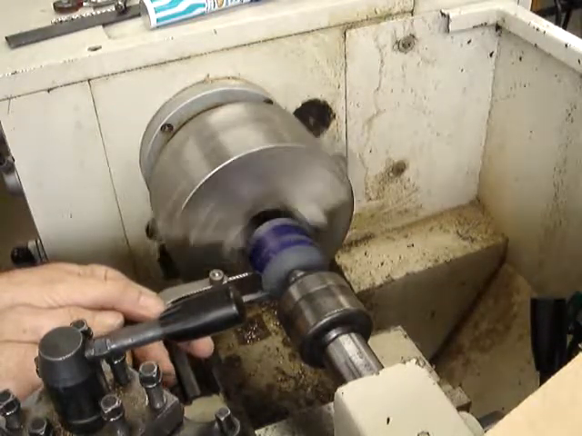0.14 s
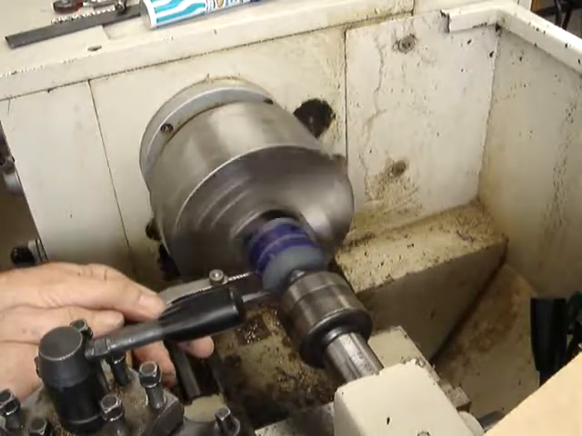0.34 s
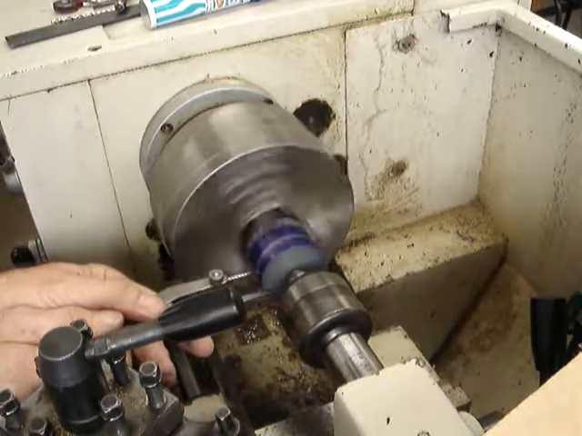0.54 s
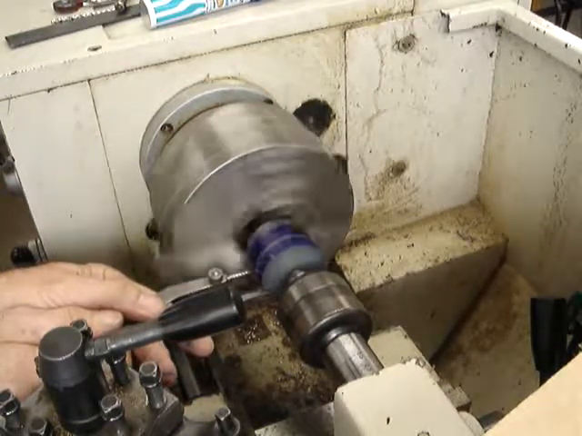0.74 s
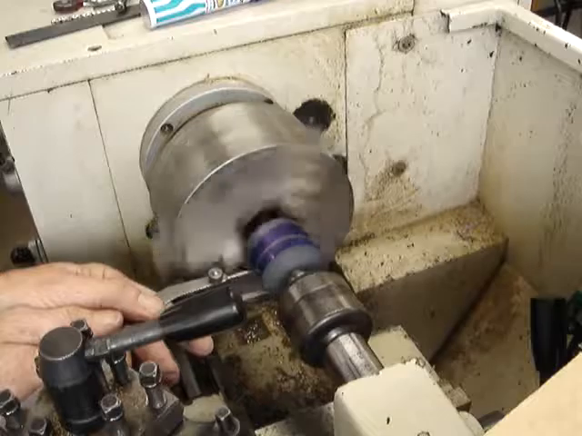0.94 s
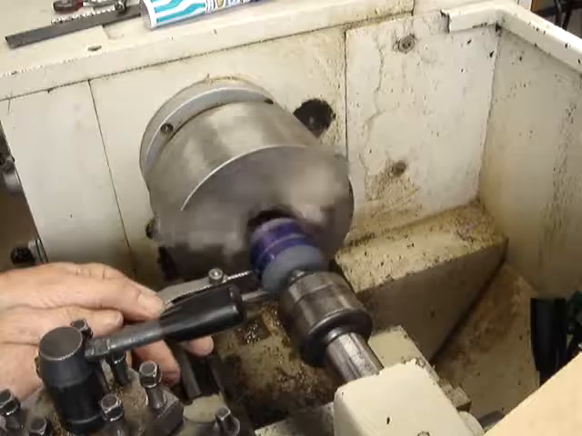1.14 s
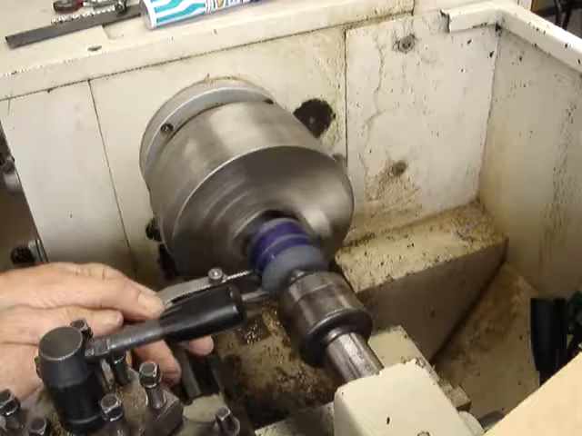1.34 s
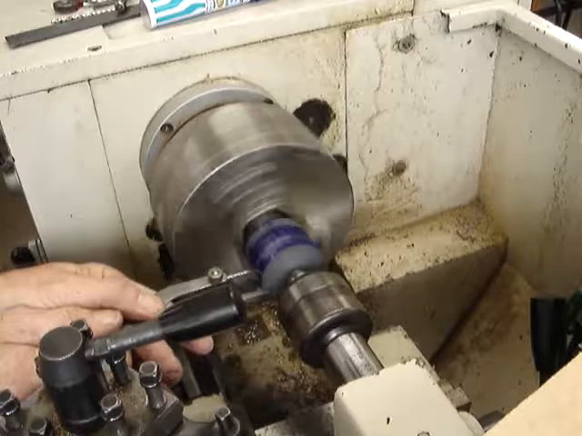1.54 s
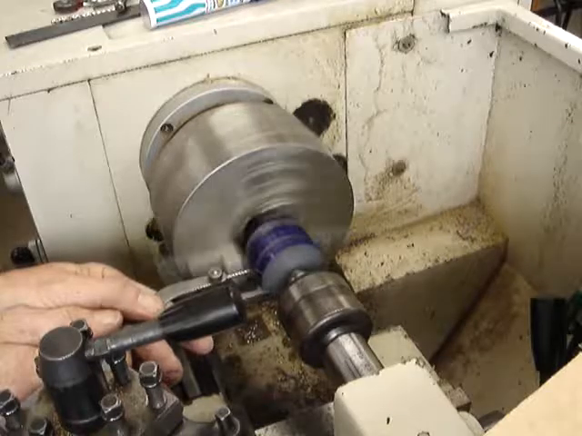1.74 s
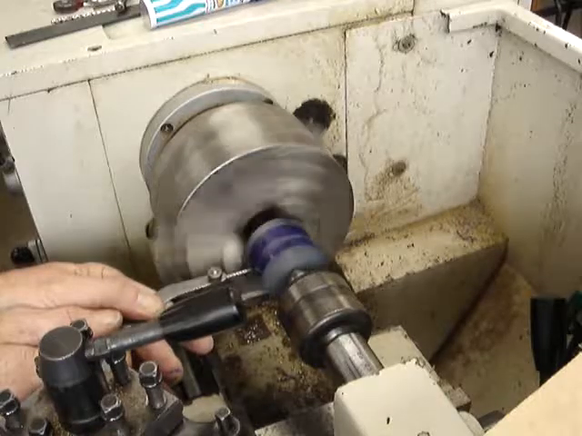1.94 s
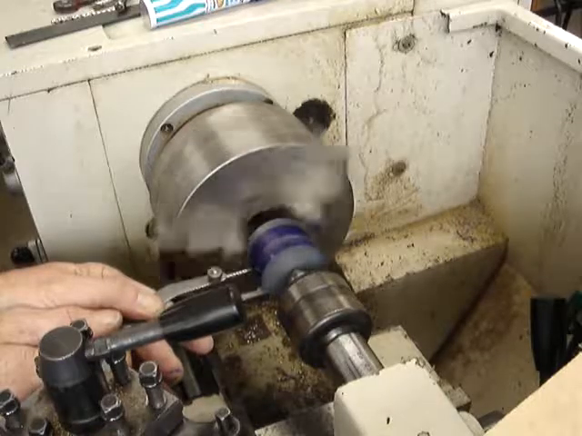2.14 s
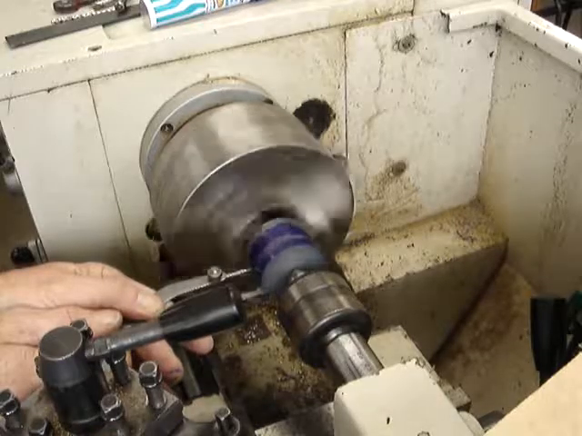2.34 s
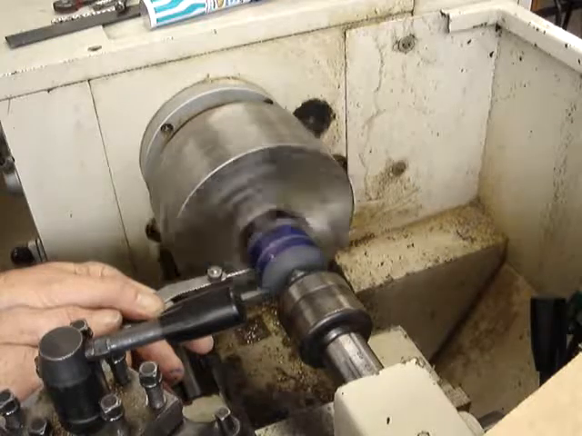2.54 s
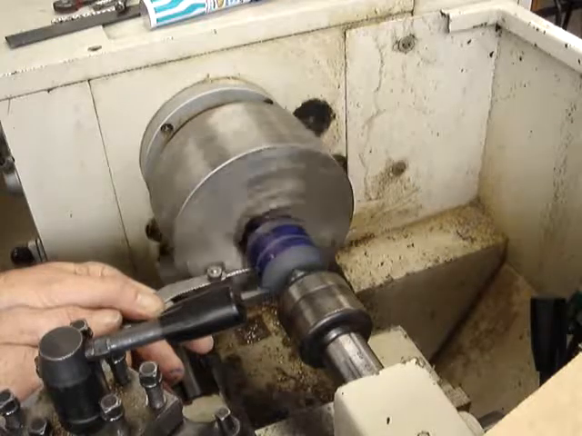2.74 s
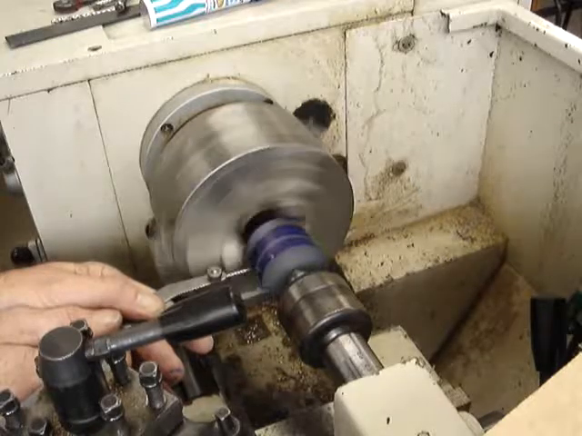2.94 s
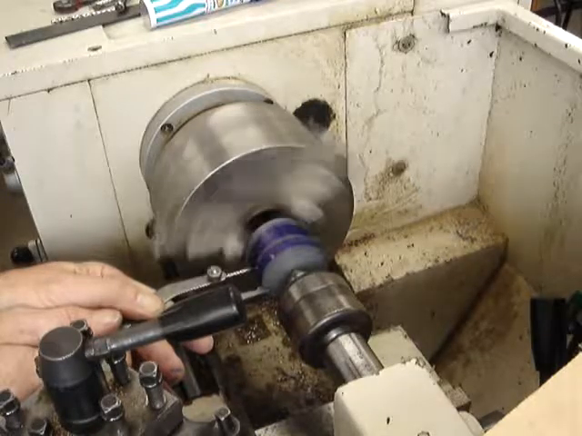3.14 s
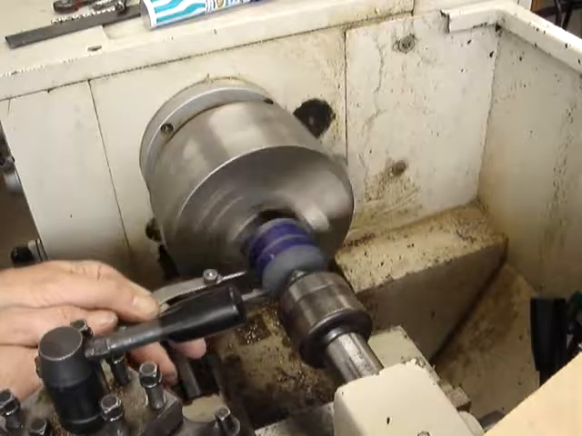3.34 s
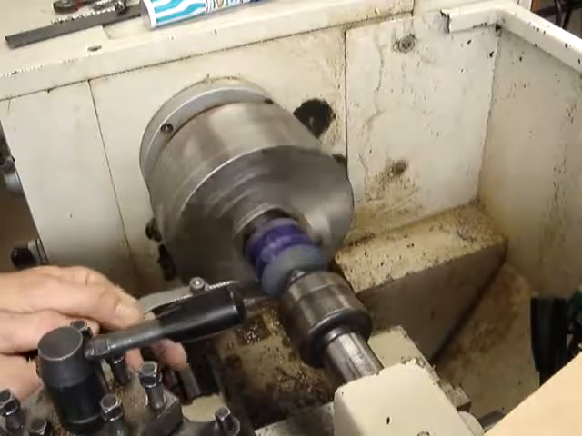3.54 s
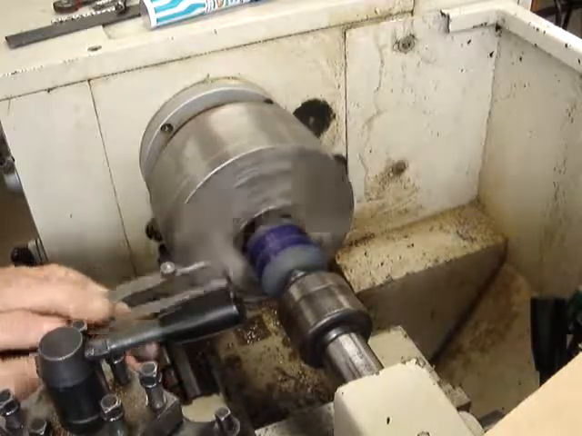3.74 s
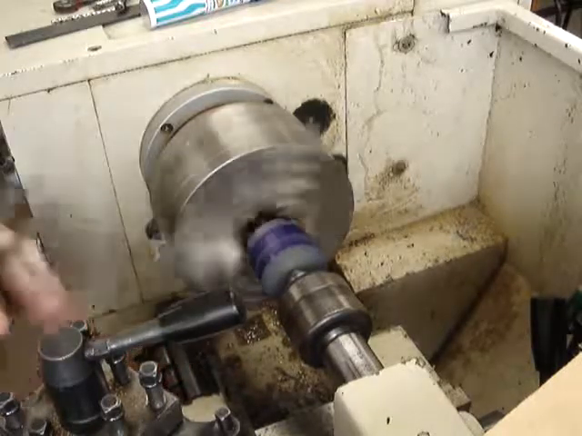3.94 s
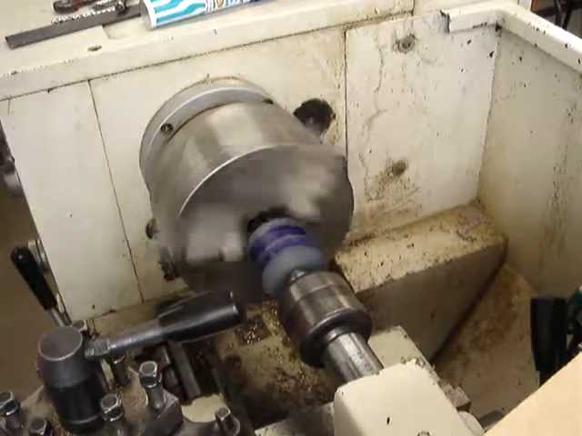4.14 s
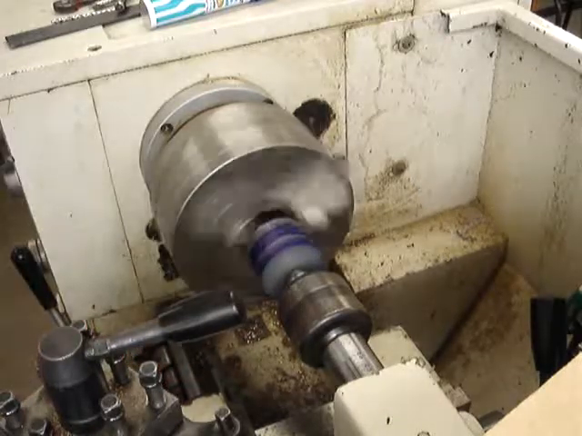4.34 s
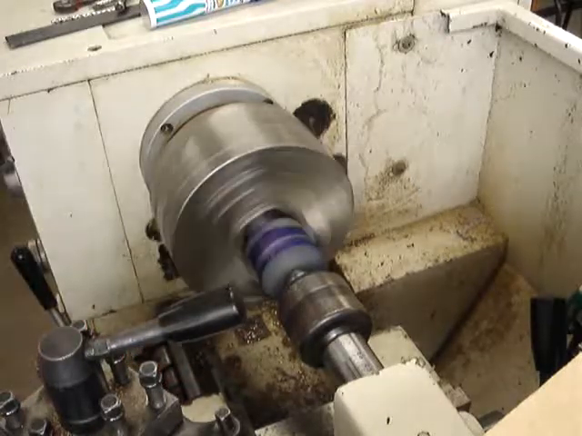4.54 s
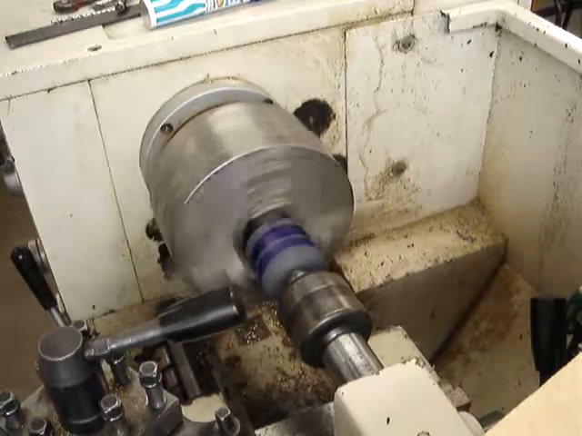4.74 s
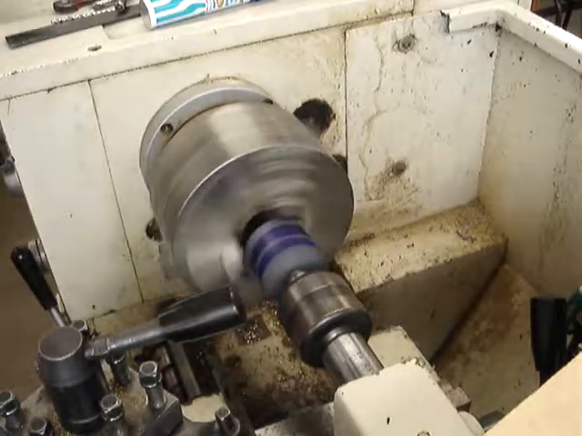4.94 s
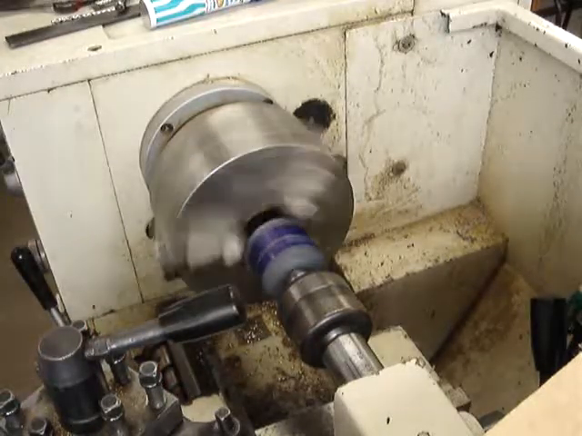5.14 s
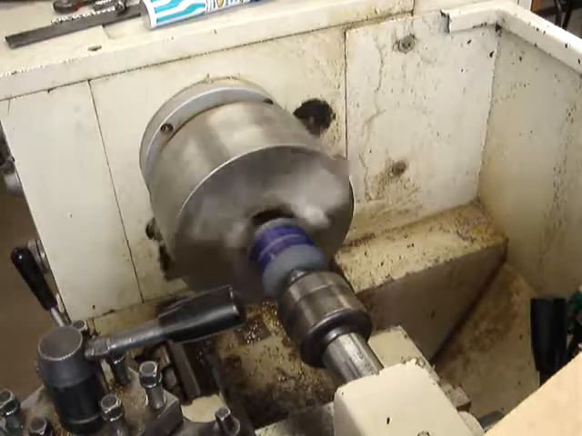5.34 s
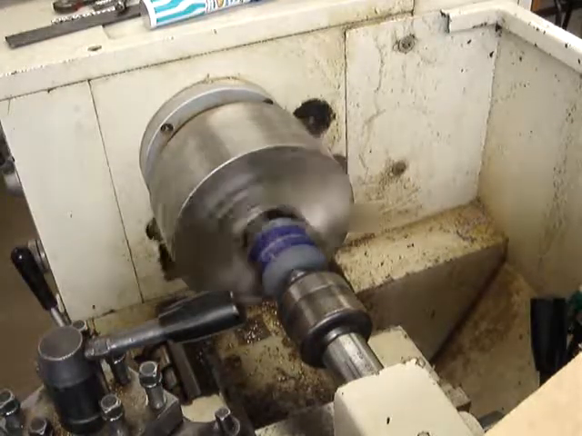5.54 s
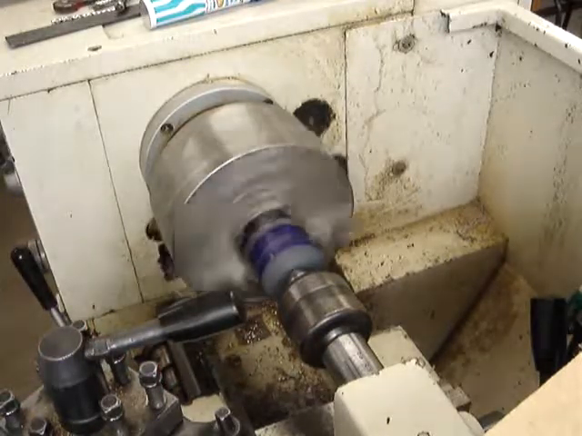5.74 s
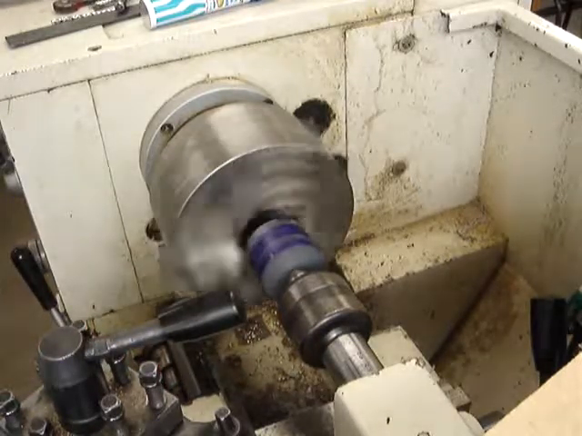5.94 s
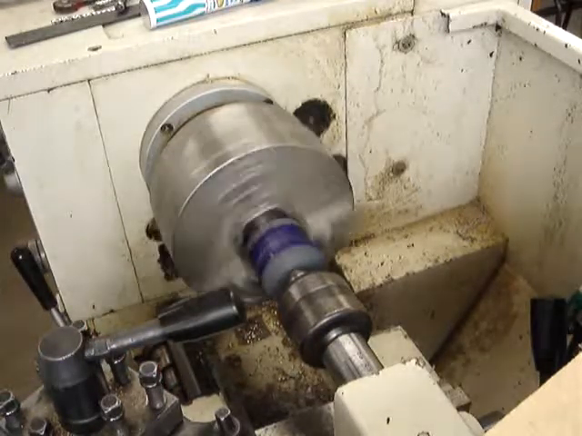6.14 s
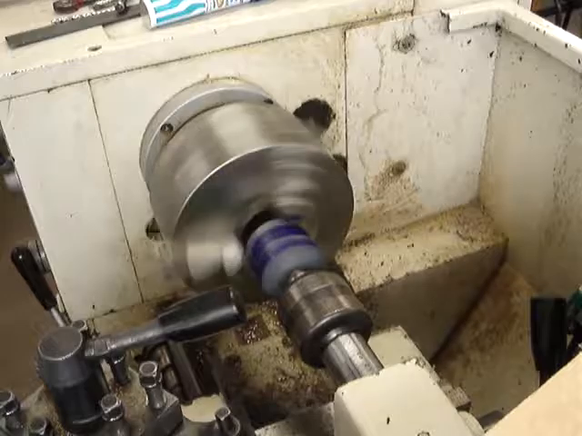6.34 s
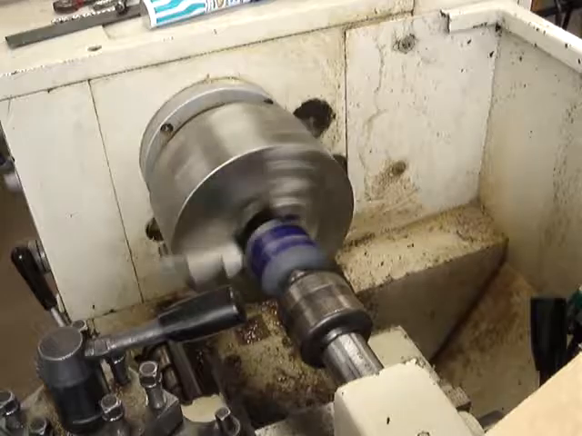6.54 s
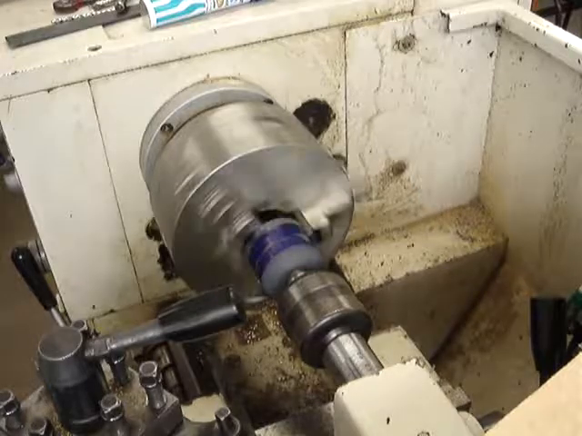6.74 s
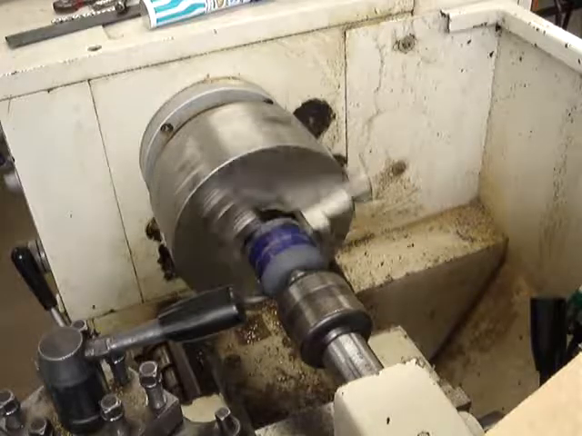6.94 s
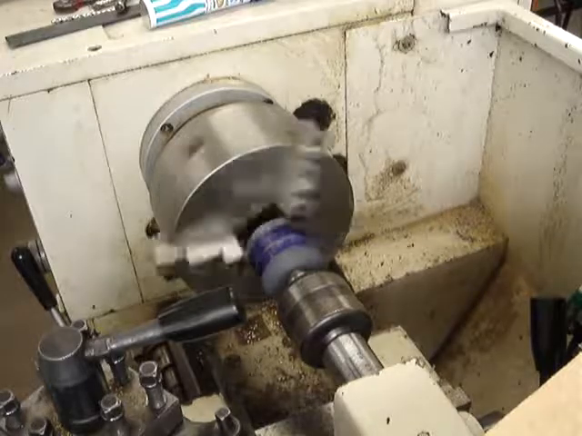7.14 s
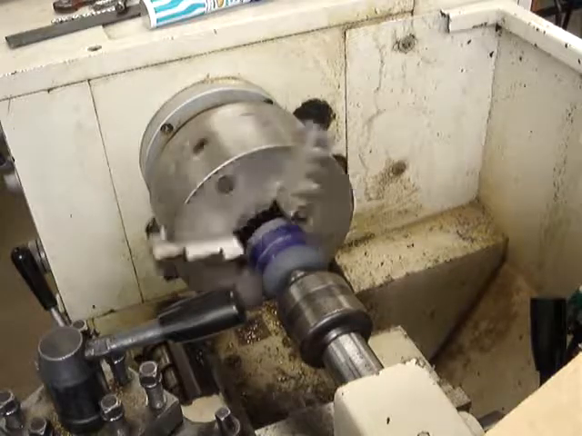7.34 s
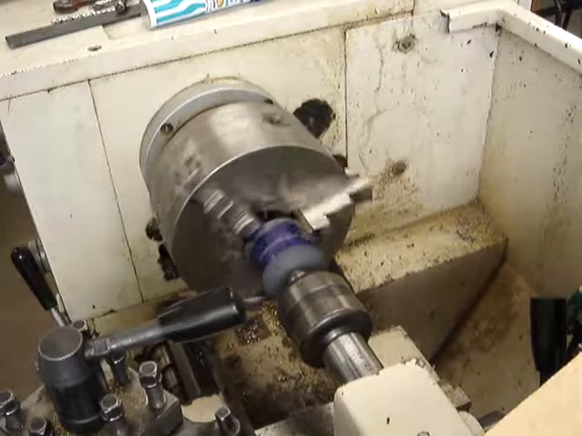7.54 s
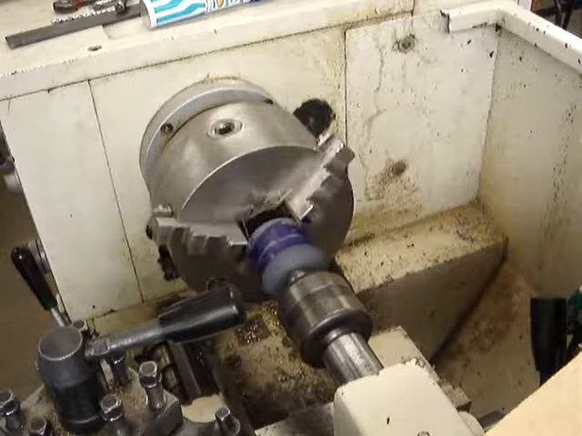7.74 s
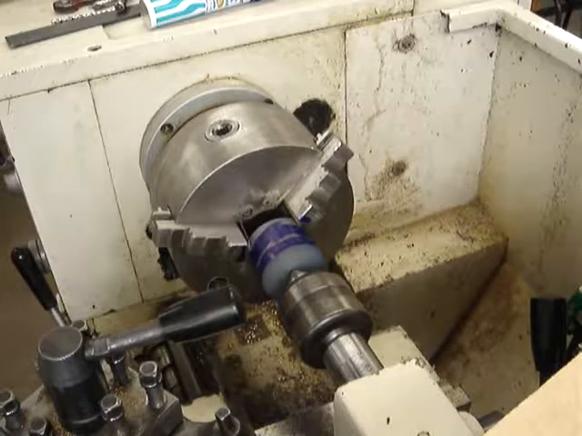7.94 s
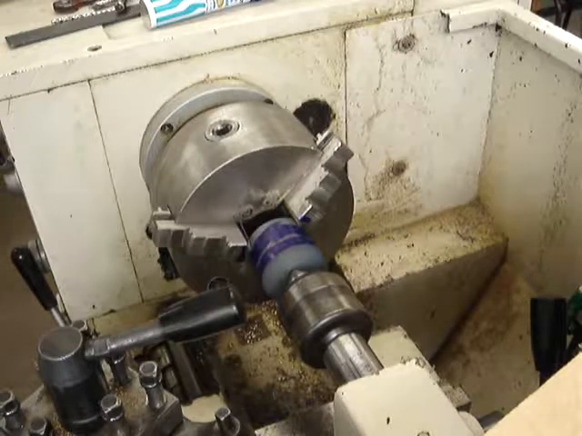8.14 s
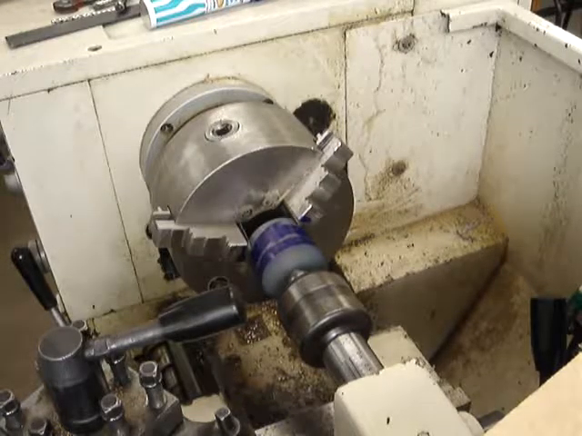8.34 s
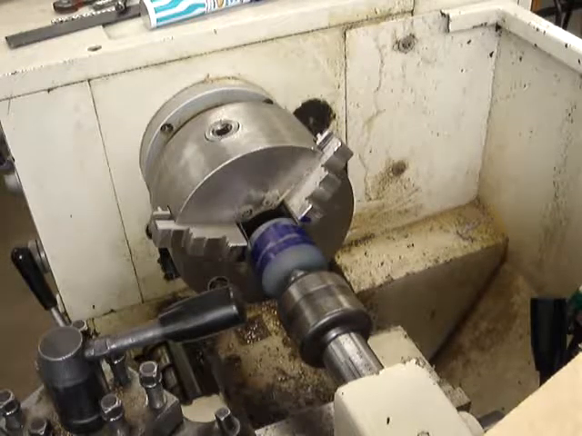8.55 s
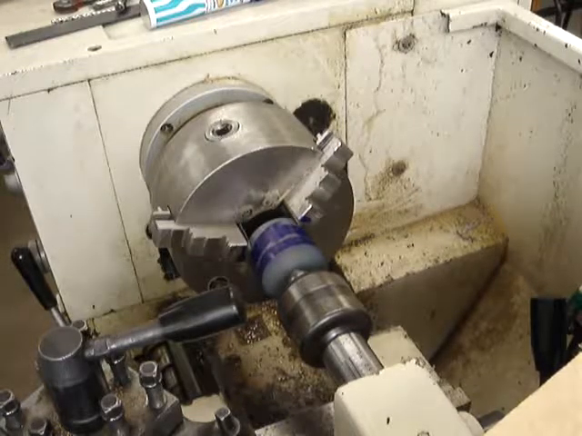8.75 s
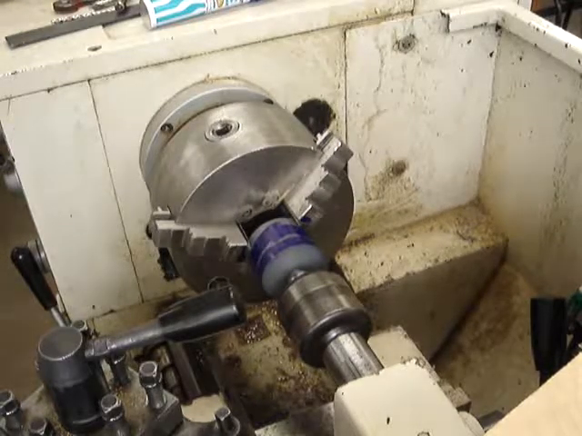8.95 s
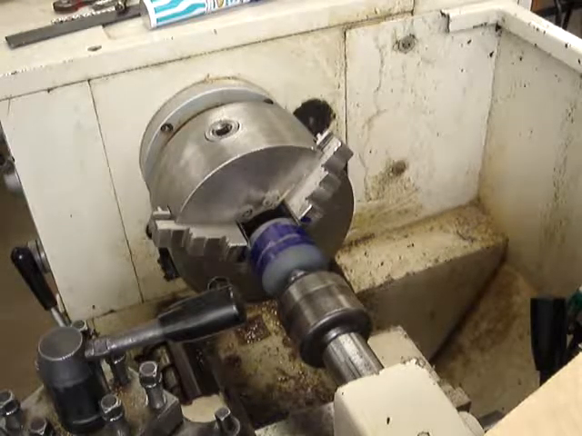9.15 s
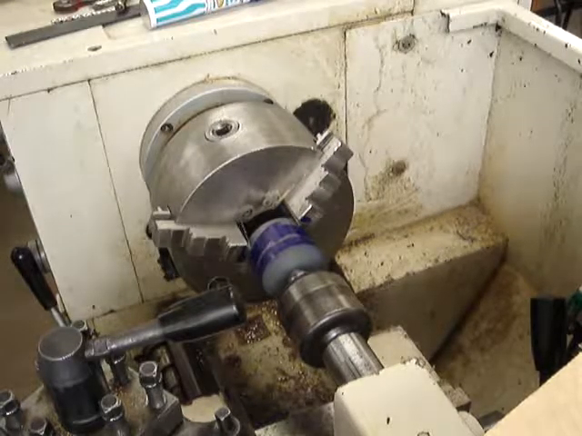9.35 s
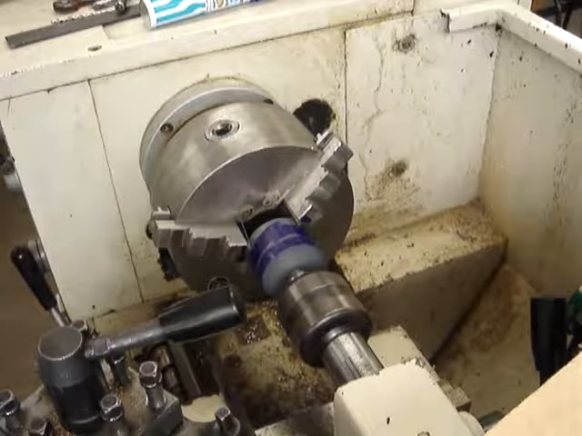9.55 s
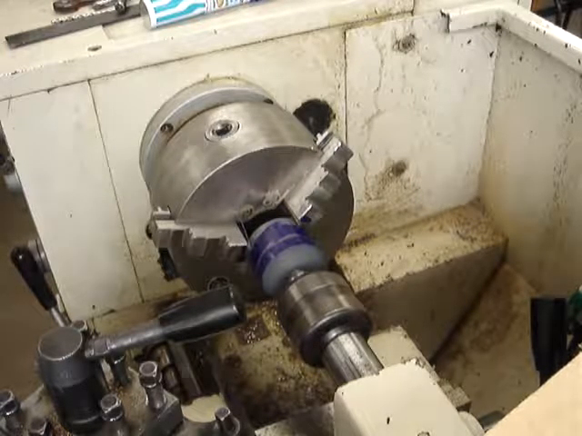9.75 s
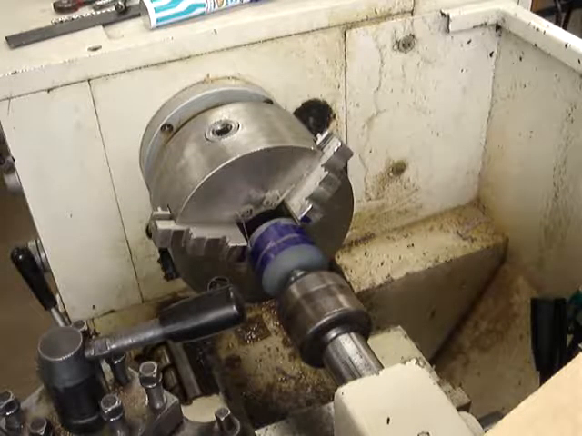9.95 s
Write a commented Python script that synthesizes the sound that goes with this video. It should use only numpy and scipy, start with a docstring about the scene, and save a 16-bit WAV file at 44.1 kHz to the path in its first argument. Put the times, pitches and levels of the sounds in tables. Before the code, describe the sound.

A nearby stereo microphone hears a loud geared lathe: buzzing whine, rough rattle and thin squeaky steel ringing, pulsing with each turn. Light hissy scraping lifts away, followed by knocks and bright tool clinks. After the motor cuts out, the whine slides down through clattering gears and grainy friction to a halt. Quiet room tone remains, with small metallic knocks, a short slide and one sharp lever bang.

```python
"""A geared metal lathe runs in a small workshop while a hand tool lightly scrapes a plastic workpiece.
Gear teeth whine and rattle in the headstock, the motor hums, and rubbing steel sings louder once a turn.
The scrape fades as the tool is lifted; the steel tool clinks and slithers as it is put down.
The motor is switched off, its hum dies, and the gears sink in pitch, clash and drag to a stop.
Levers are then knocked over and one slides to its stop, over the low electric hum of the quiet shop."""
import sys
import numpy as np
from scipy import signal
from scipy.fft import rfft, irfft
from scipy.io import wavfile

SR = 44100
rng = np.random.default_rng(int(sys.argv[2]) if len(sys.argv) > 2 else 0)


def digitize_waveform(pressure):
    """Quantize a signal to 16-bit integers and store it at the path in sys.argv[1].

    Rows of a 2-D input are taken as channels; values are limited to [-1, 1].
    """
    field = np.atleast_2d(pressure).T
    bounded = np.clip(field, -1, 1)
    quanta = np.round(bounded * 32767).astype(np.int16)
    wavfile.write(sys.argv[1], SR, quanta)


N = 440107
TIME = np.arange(N) / SR

# rates at full speed, and the mains
SPINDLE_HZ, SHAFT_HZ, MOTOR_HZ, SECOND_MESH_HZ, MAINS_HZ = 2.58, 7.19, 24.675, 284.95, 50
TIGHT_SPOT_S, SWITCH_OFF_S = 0.15, 6.07

# headstock panel resonances: (frequency [Hz], width [Hz], lift [dB])
PANELS = [(86, 6, 11), (150, 6, 9), (204, 6, 18), (280, 18, 8), (324, 6, 10), (358, 13, 18), (441, 23, 13),
          (515, 9, 11), (595, 13, 13), (683, 10, 11), (721, 33, 9), (786, 15, 11), (850, 54, 8),
          (894, 17, 11), (934, 16, 16), (992, 6, 10), (1061, 33, 11), (1170, 68, 10), (1285, 22, 12),
          (1351, 36, 11), (1454, 34, 13), (1646, 29, 7), (1883, 11, 5), (2364, 11, 6), (2676, 14, 8),
          (2760, 18, 7), (3054, 10, 9)]
# likeness of the two channels: (frequency [Hz], correlation [-1 to 1])
LIKENESS = [(55, 0.6), (110, -0.25), (190, -0.95), (270, -0.63), (400, -0.74), (530, 0.42), (1100, 0.86),
            (2300, 0.8), (4800, 0.14), (9900, -0.62)]


def from_db(db):
    """Decibels to amplitude gain."""
    return 10 ** (np.asarray(db) / 20)


def rms_one(x):
    """Scale to unit power."""
    return x / np.sqrt(np.mean(x ** 2) + 1e-20)


def in_time(rows):
    """Interpolate each column over the scene's time."""
    s, *columns = np.transpose(rows)
    return [np.interp(TIME, s, c) for c in columns]


def at_hz(points, hz):
    """Read a spectrum on a log-frequency axis."""
    f, value = np.transpose(points)
    return np.interp(np.log(np.maximum(hz, 1)), np.log(f), value)


def pan(db):
    """Left and right gains of unit mean power, db apart."""
    return rms_one(from_db([[db / 2], [-db / 2]]))


def white():
    """Two unrelated white noises."""
    return rng.standard_normal((2, N))


def drift(rate_hz):
    """Slow random curve of spread 1: noise through two equal poles, computed every 40 samples."""
    r = np.exp(-2 * np.pi * rate_hz * 40 / SR)
    noise = rng.standard_normal(N // 40 + 2002)
    slow = signal.lfilter([1], [1, -2 * r, r * r], noise)[2000:]
    return np.interp(np.arange(N) / 40, np.arange(len(slow)), rms_one(slow))


def bump(s, half_s):
    """Gaussian rise and fall of height 1."""
    return np.exp(-.5 * ((TIME - s) / half_s) ** 2)


def swells(rows):
    """Gain of sounds that grow to a peak and die away, both at a steady rate in dB."""
    gain = np.zeros(N)
    for s, db, rise_s, t60_s in rows:
        gain += from_db(db - 60 * np.maximum((s - TIME) / rise_s, (TIME - s) / t60_s))
    return gain


def coasting(ease_s):
    """Ramp from 0 to 1 once the motor is off."""
    return np.clip((TIME - SWITCH_OFF_S) / ease_s, 0, 1)


def colour(hz, spectrum, resonances=()):
    """Gain of a broad spectrum with resonances standing on it."""
    power = 1
    for f, width_hz, lift_db in resonances:
        power = power + (from_db(lift_db) ** 2 - 1) / (1 + (2 * (hz - f) / width_hz) ** 2)
    return from_db(at_hz(spectrum, hz)) * np.sqrt(np.abs(power))


def radiate(pair, spectrum, resonances=(), band=(0, SR)):
    """Two unrelated excitations become coloured stereo, with unit power in the band [Hz] of the middle."""
    hz = np.fft.rfftfreq(N, 1 / SR)
    mid, side = rfft(pair) * colour(hz, spectrum, resonances)
    alike = np.clip(at_hz(LIKENESS, hz), -.98, .98)
    mid, side = np.sqrt(1 + alike) * mid, np.sqrt(1 - alike) * side
    in_band = (hz > band[0]) & (hz < band[1])
    level = np.sqrt(2 * np.sum(np.abs(mid[in_band]) ** 2)) / N
    return irfft([mid + side, mid - side], N) / level


def tones(orders, base_hz, clock_s, waver_db):
    """Multiples of a rotation, each wavering in level and reaching the two sides out of step."""
    out, off = np.zeros((2, N)), coasting(0.024)
    for multiple, db, side_db, *coast_db in orders:
        hz = round(multiple) * base_hz
        apart = np.arccos(np.clip(at_hz(LIKENESS, hz), -1, 1)) / 2
        phase = 2 * np.pi * (hz * clock_s + rng.random())
        level_db = db + off * sum(coast_db) + waver_db * (1 + 1.8 * off) * drift(16.8)
        out += np.sqrt(2) * from_db(level_db) * pan(side_db) * np.sin([phase + apart, phase - apart])
    return out


def whine(speed, travel_s, wobble_s=.000072, jitter_s=.000022, backlash_s=0.00021):
    """Gear mesh tones; an off-centre gear swings their pitch, and unloaded teeth wander in their backlash."""
    # tones before the speed factor:
    # (multiple of motor or second mesh rate, level [dB], left-right [dB], change when coasting [dB])
    motor_orders = [(24, -33, -6, -11), (36, -42, -6, -3), (40, -46, -7, -3), (48, -34.5, -6, -6),
                    (60, -24, -4, -8), (72, -47, 1, 9), (84, -50, -1, 3), (112, -47, -4, -5)]
    mesh_orders = [(1, -32, 9.5, -8), (2, -44, -2.5, -9), (3, -52, -16, -13), (4, -32.5, -9, -9.5),
                   (5, -43.5, -13, -1)]
    wobble = wobble_s * np.sin(2 * np.pi * SHAFT_HZ * travel_s)
    play = backlash_s * coasting(.5) * drift(23)
    clock_s = travel_s + wobble + jitter_s * drift(4.5) + play
    mesh = tones(motor_orders, MOTOR_HZ, clock_s, waver_db=1.5)
    mesh = mesh + tones(mesh_orders, SECOND_MESH_HZ, clock_s, waver_db=2.0)
    # sinking tones flare up as they pass each panel resonance
    panels = colour(np.fft.rfftfreq(N, 1 / SR), [(1400, -1.0), (1800, -7)], PANELS)
    sinking = coasting(.1)
    return speed ** 3 * ((1 - sinking) * mesh + sinking * irfft(rfft(mesh) * panels, N))


def gear_level(full_db, power, fall_db_per_s, speed):
    """Level in dB: it sinks with the speed and the lost load, but no faster than the casting rings out."""
    unloaded_db = -1.43
    level_db = full_db + power * 20 * np.log10(speed + 1e-9) + unloaded_db * coasting(0.07)
    return np.maximum.accumulate(level_db + fall_db_per_s * TIME) - fall_db_per_s * TIME


def low_pass(x, hz):
    """Zero-phase low-pass."""
    return signal.sosfiltfilt(signal.butter(2, hz, fs=SR, output="sos"), x)


def workshop(x, share=0.45, t60_s=0.29):
    """Walls and guards send back a dense tail that fills the gaps between tooth blows."""
    t = TIME[:SR // 2]
    tail = rng.standard_normal(len(t)) * from_db(-60 * t / t60_s) * (t > .002)
    tail = signal.sosfilt(signal.butter(2, 1500, "high", fs=SR, output="sos"), tail)
    return x + share * signal.fftconvolve(x, [tail / np.linalg.norm(tail)], axes=1)[:, :N]


def gear_noise(speed, travel_s, tight, spread_db=2.0, rolling=0.08):
    """Uneven tooth blows over rolling noise excite the headstock: a rumble below and a rattle above."""
    # broad colour of the headstock: (frequency [Hz], density [dB per Hz])
    headstock = [(30, -37.5), (75, -20.5), (115, -17), (160, -6.5), (245, -5), (320, -3), (600, -5.5),
                 (1300, -4.5), (2000, -0.5), (3850, -5), (4250, -12), (5100, -10), (5900, -22),
                 (9800, -24.5)]
    # unloaded gears clash as they slow: (time [s], rumble lift [dB], rattle lift [dB])
    clashes = [(6.49, 3, 8), (6.92, 5, 10), (7.12, 5, 9.5)]
    clash_half_s = 0.069

    blows = np.zeros((2, N))
    for mesh_hz in (SECOND_MESH_HZ, 24 * MOTOR_HZ):
        at = np.flatnonzero(np.diff(np.floor(mesh_hz * travel_s)))
        force = from_db(spread_db * np.minimum(rng.standard_normal(len(at)), 2))
        blows[:, at] += force * rng.standard_normal((2, len(at)))
    sway_db = 0.23 * np.sin(2 * np.pi * MOTOR_HZ * travel_s) + 1.41 * drift(14.3)
    blows = (blows * 0.41 + rolling * white()) * from_db(sway_db)

    # both swell at the tight spot of each turn
    rumble_db = gear_level(-26.5, power=0.78, fall_db_per_s=36.5, speed=speed) + 0.66 * tight
    rattle_db = gear_level(-26, power=1.56, fall_db_per_s=33, speed=speed) + 0.86 * tight
    for s, rumble_lift_db, rattle_lift_db in clashes:
        clash = bump(s, clash_half_s)
        rumble_db = rumble_db + rumble_lift_db * clash
        rattle_db = rattle_db + rattle_lift_db * clash

    low = radiate(blows, headstock, PANELS, band=(450, 1100))
    high = radiate(blows, headstock, PANELS, band=(1700, 3100))
    rumble = low_pass(low, 1130) * from_db(rumble_db)
    # slow gears sound deeper
    rumble = rumble + low_pass(rumble, 270) * (from_db(5.0 * (1.5 - speed)) - 1)
    rattle = (high - low_pass(high, 1395)) * from_db(rattle_db)
    # harder blows are brighter
    rattle = rattle + (rattle - low_pass(rattle, 4500)) * (from_db(1.0 * tight) - 1)
    return (rumble + 0.85 * workshop(rattle)) * pan(-3.0)


def hum():
    """Magnetic hum of the motor at mains multiples; it dies when the current is cut."""
    # (multiple of the mains, level [dB], left-right [dB])
    hum_orders = [(2, -43.5, -4.5), (4, -38, -3.5), (6, -32.5, -13), (8, -33.5, -15.5), (10, -56.5, -6)]
    current = np.exp(-np.maximum(TIME - SWITCH_OFF_S, 0) / 0.06)
    return current * tones(hum_orders, MAINS_HZ, TIME, waver_db=3.0)


def singing_steel(speed, tight):
    """Rubbing keeps a few sharp modes ringing, loudest at the tight spot; at times it catches and squeals."""
    # modes of the rubbing steel: (frequency [Hz], width [Hz], relative level [dB])
    low_song = [(3393, 35, 2), (4980, 69, -8)]
    high_song = [(6823, 26, -1.5), (9090, 87, -7.5)]
    # squeals: (time [s], low modes [dB], high modes [dB])
    squeals = [(.9, -21.5, -49), (2.21, -28.5, -43), (2.96, -49, -33), (3.24, -25.5, -49), (3.63, -22, -35),
               (4.39, -29, -40), (5.19, -21, -50), (5.54, -24.5, -52), (5.78, -25, -36), (6.02, -25, -41),
               (6.19, -29.5, -53), (6.29, -26.5, -43), (6.37, -23, -35.5), (6.51, -27, -39),
               (7.02, -40, -52)]
    swell_db, chance_db, speed_power, squeal_half_s = 1.5, 2.2, 1.7, 0.02
    out, (times, *squeal_dbs) = np.zeros((2, N)), np.transpose(squeals)
    side_phase = np.array([[.4j], [-.4j]])
    for modes, rub_db, dbs in zip((low_song, high_song), (-33.5, -42.5), squeal_dbs):
        level_db = rub_db + swell_db * tight + chance_db * drift(6)
        rub = (speed + 1e-9) ** speed_power * from_db(level_db)
        squeal = sum(from_db(db) * bump(s, squeal_half_s) for s, db in zip(times, dbs))
        gain = np.hypot(rub, squeal)
        for hz, width_hz, mode_db in modes:
            wander = drift(width_hz / 2) + 1j * drift(width_hz / 2)
            wander = wander / np.abs(wander) ** 0.17     # friction evens out the swing
            ring = np.real(wander * np.exp(2j * np.pi * hz * TIME + side_phase))
            out += gain * from_db(mode_db) * rms_one(ring)
    return out * pan(-3.5)


def scrape():
    """The edge catches the plastic in quick uneven bites: deeper at first, then light until it is lifted."""
    # hiss of the shaving: (frequency [Hz], density [dB per Hz])
    shaving = [(1500, -14), (4500, -5.5), (7500, 4), (10000, -6)]
    light_db, bite_db, bite_s, lift_s, lift_t60_s = -45.5, 7.5, .55, 3.4, 0.87
    db = light_db + bite_db * np.exp(-TIME / bite_s)
    db = db - 60 * np.maximum(TIME - lift_s, 0) / lift_t60_s
    return from_db(db + 3.2 * drift(59)) * radiate(white(), shaving)


def add(out, s, sound):
    """Mix a sound in at a time."""
    at = int(s * SR)
    out[:, at:at + sound.shape[1]] += sound[:, :N - at]


def knocks(room_db=-18, room_t60_s=0.54, width=0.68):
    """Switch, levers and backlash: each contact is a short burst into metal modes, followed by the room."""
    # (time [s], level [dB], brightness [dB per octave], t60 of the contact [s], thud [dB], sharp edge [dB])
    contacts = [(4.41, -30, 2, .2, -1, 1), (4.83, -26, 1, .12, 0, 5), (5.505, -24, 2, .08, -2, 0),
                (6.053, -21, 1.5, 0.23, -2, 8), (6.858, -21, -2, 0.46, -1, 6.5),
                (7.6, -32.5, 1, 0.053, 0, 6), (7.756, -48, -.5, 0.21, 0, 10), (7.849, -40, -6, 0.19, 2, 8),
                (8.102, -40, -5, .15, -2, 5), (8.207, -54.5, .3, 0.14, -3, 7), (8.41, -52, .5, .25, 0, 10),
                (8.454, -49, -7, .12, -8, 0), (8.544, -37.5, -6, 0.11, -5, 4),
                (8.671, -36, -1.5, 0.14, -3, -5), (8.717, -31.5, -2.5, .16, 0, 8),
                (8.811, -29, -1, .05, 0, 0), (8.815, -10.5, 3, .052, 2.5, -3.5), (8.862, -33, 1, .08, 2, 3),
                (9.208, -48.5, -6, 0.14, -1, 12), (9.319, -40.5, -2, .12, 4, 2),
                (9.333, -30, 2.2, 0.12, 10, 2)]
    # what they ring with: (frequency [Hz], density [dB per Hz]); (frequency [Hz], width [Hz], lift [dB])
    lever = [(40, -18), (140, -23), (420, -15), (1100, -11), (2000, -4.5), (4200, -4.5), (6700, -5.5),
             (7800, -15), (10000, -20), (13000, -61)]
    lever_modes = [(1380, 76, 3.1), (2020, 210, 8), (2580, 80, 4.5), (2822, 28, 15.3), (3740, 240, 6.9),
                   (4180, 420, 4.5), (5000, 90, 2.3), (6100, 38, 3.9), (6570, 36, 8.2), (7100, 38, 5.8)]
    thud_below_hz, edge_above_hz = 1400, 7700
    out, t = np.zeros((2, N)), TIME[:SR]
    hz = np.fft.rfftfreq(SR, 1 / SR)
    thud = 1 / (1 + (hz / thud_below_hz) ** 6)
    edge = 1 - 1 / (1 + (hz / edge_above_hz) ** 24)
    octaves = np.log2(np.maximum(hz, 600) / 3000)
    metal = colour(hz, lever, lever_modes)
    for s, db, tilt_db, t60_s, thud_db, edge_db in contacts:
        mid, side = rng.standard_normal((2, SR))
        decay = np.hypot(from_db(-60 * t / t60_s), from_db(room_db - 60 * t / room_t60_s))
        burst = np.array([mid + width * side, mid - width * side]) * decay
        gain = rms_one(metal * from_db(tilt_db * octaves + thud_db * thud + edge_db * edge))
        # minimum phase: the metal rings only after it is struck
        cepstrum = irfft(np.log(gain))
        cepstrum[1:SR // 2] *= 2
        cepstrum[SR // 2 + 1:] = 0
        add(out, s, from_db(db) * irfft(rfft(burst) * np.exp(rfft(cepstrum))))
    return out * pan(-2.2)


def clinks(scatter_hz=70):
    """The tool is put down: every touch chatters three times and rings its modes with new strengths."""
    # touches: (time [s], level [dB])
    touches = [(5.199, -27.5), (5.275, -35), (5.35, -36), (5.395, -31), (5.429, -30), (5.46, -36),
               (5.507, -28), (5.545, -44), (5.73, -39)]
    # modes of the steel tool: (frequency [Hz], relative level [dB], t60 [s])
    tool_modes = [(5770, 4.5, 0.076), (7010, 4, 0.041), (7710, 3.5, 0.19), (8060, -12, .1),
                  (8600, -1, 0.12), (9470, -3, 0.12)]
    out, t = np.zeros((2, N)), TIME[:SR // 2]
    for s, db in touches:
        for delay_s in rng.exponential(.008, size=3):
            ring = np.zeros((2, len(t)))
            for hz, mode_db, t60_s in tool_modes:
                strength = rng.uniform(-0.8, 0.84, (2, 1))
                tone = np.sin(2 * np.pi * (hz + rng.normal(0, scatter_hz)) * t)
                ring += from_db(db + mode_db - 60 * t / t60_s) * strength * tone
            add(out, s + delay_s, ring)
    return out


def slither():
    """The steel tool slides briefly over steel between touches: a short swell of fluttering hiss."""
    # (time [s], half length [s], level [dB])
    s, half_s, db = (5.41, .06, -36)
    # (frequency [Hz], density [dB per Hz])
    slither_colour = [(4000, -33), (5800, -9), (7000, -3), (7700, 3), (8200, -3), (10000, -5)]
    return bump(s, half_s) * from_db(db + 2.5 * drift(45)) * radiate(white(), slither_colour)


def drag():
    """Dry, grainy friction of the slowing spindle, in surges that die away as it rubs to rest."""
    # (time [s], level [dB], time to rise 60 dB [s], t60 [s])
    drags = [(6.49, -38, 1, .35), (7.12, -28.5, 0.6, 0.5), (7.3, -46, .8, 2.1)]
    # (frequency [Hz], density [dB per Hz])
    drag_colour = [(130, -11), (250, 16), (600, 6), (1400, -3), (2500, 0), (3300, -3), (3950, 6),
                   (4500, -5.5), (6000, -13.5), (10000, -28)]
    grain = from_db(1.7 * drift(70))
    return swells(drags) * grain * radiate(white(), drag_colour) * pan(-2.5)


def slide(spring_s=8.672, spring_hz=2853, spring_db=-42, spring_t60_s=0.87):
    """A lever slides to its stop, steel dragging on steel in small slips; a flicked spring rings on."""
    # (time [s], level [dB], time to rise 60 dB [s], t60 [s])
    slides = [(8.77, -43.5, 0.83, 0.67)]
    # (frequency [Hz], density [dB per Hz])
    slide_colour = [(80, -7), (300, 1), (700, -2), (1100, 1), (1500, -4), (3300, -6), (5000, -18),
                    (10000, -25)]
    grind = swells(slides) * from_db(1.1 * drift(70)) * radiate(white(), slide_colour)
    since_s = np.maximum(TIME - spring_s, 0)
    spring = from_db(spring_db - 60 * since_s / spring_t60_s) * np.sin(2 * np.pi * spring_hz * since_s)
    return (grind + spring) * pan(-3)


def jolts():
    """The cabinet shudders dully when the drive lets go and when a lever hits its stop."""
    # (time [s], level [dB], t60 [s])
    shudders = [(6.08, -44, 0.67), (8.814, -49, .2)]
    # (frequency [Hz], density [dB per Hz])
    jolt_colour = [(20, -9), (45, 1.5), (90, 2), (140, -25), (400, -49), (2000, -90)]
    gain = np.zeros(N)
    for s, db, t60_s in shudders:
        gain += (TIME > s) * from_db(db - 60 * np.maximum(TIME - s, 0) / t60_s)
    return gain * radiate(white(), jolt_colour)


def quiet_shop():
    """Steady coloured noise with two resonances, and a low electric hum at mains multiples."""
    # (frequency [Hz], density [dB per Hz])
    shop = [(25, -2), (70, -6), (120, -4), (300, -4), (600, -12), (1200, -18), (3000, -17), (7000, -20),
            (10000, -21), (13000, -61)]
    # (multiple of the mains, level [dB], left-right [dB])
    shop_orders = [(4, -69, -1.5), (10, -74, -2)]
    air = from_db(-59) * radiate(white(), shop, [(199, 11, 13), (7950, 200, 9.1)])
    return air + tones(shop_orders, MAINS_HZ, TIME, waver_db=.5)


def scene():
    """The drive's speed sets every gear tone, tooth blow and the steel's song; the rest is timed."""
    # drive speed: (time [s], share of full speed)
    speed_curve = [(0, 1), (6.05, 1), (6.18, .905), (6.3, .825), (6.47, .716), (6.6, .642), (6.8, .525),
                   (7.15, .33), (7.8, 0)]
    speed, = in_time(speed_curve)
    travel_s = np.cumsum(speed) / SR     # seconds' worth of full-speed turning
    tight = speed * np.cos(2 * np.pi * SPINDLE_HZ * (travel_s - TIGHT_SPOT_S))
    gears = whine(speed, travel_s) + gear_noise(speed, travel_s, tight)
    lathe = gears + hum() + singing_steel(speed, tight) + drag() + jolts()
    handling = scrape() + knocks() + clinks() + slither() + slide()
    return lathe + handling + quiet_shop()


def record(dry):
    """The highest peaks are rounded and the top is cut steeply."""
    rounded = dry / (1 + (dry / .85) ** 6) ** (1 / 6)
    return signal.sosfilt(signal.ellip(12, .1, 90, 10050, fs=SR, output="sos"), rounded)


dry = scene()
out = record(dry)
digitize_waveform(out)
```